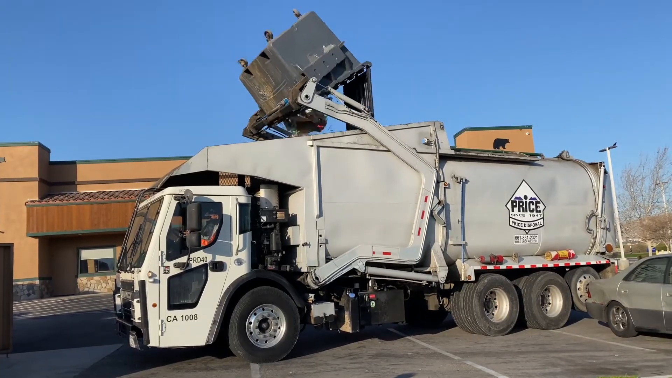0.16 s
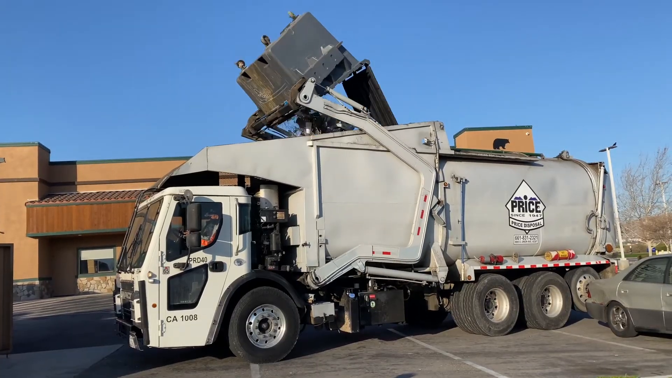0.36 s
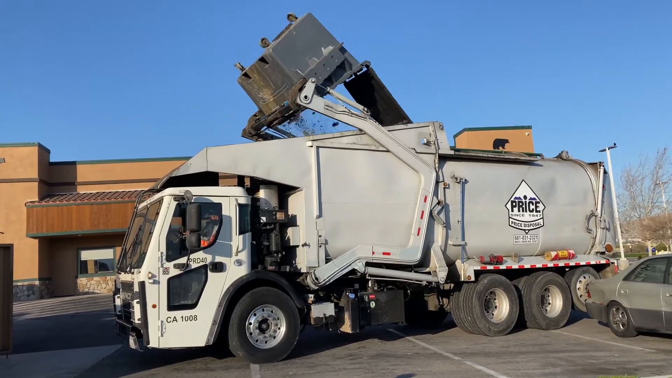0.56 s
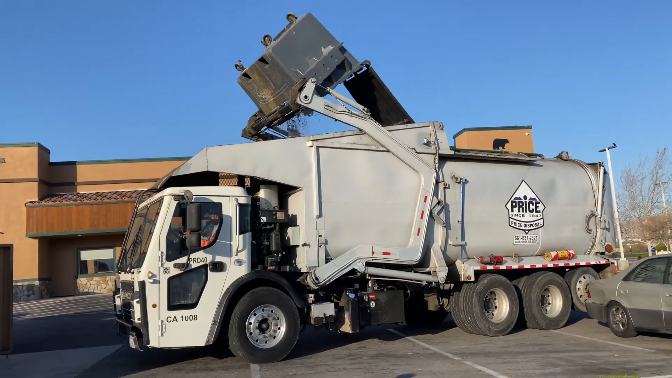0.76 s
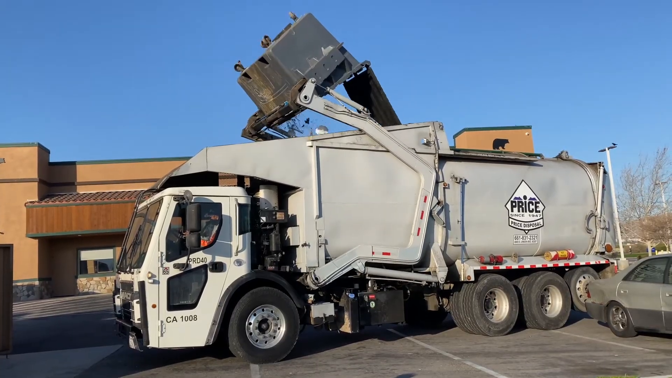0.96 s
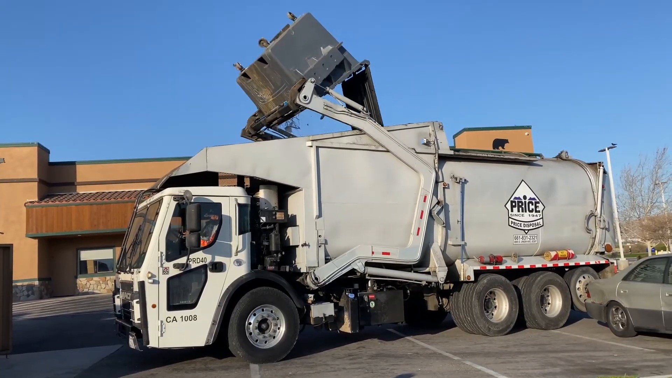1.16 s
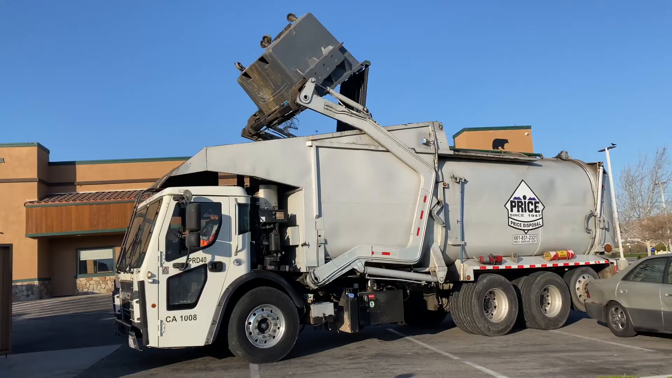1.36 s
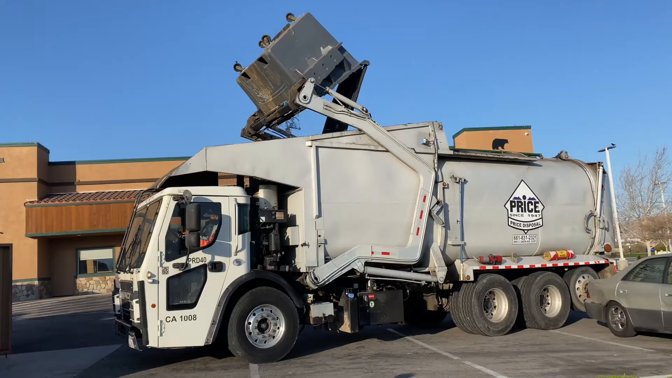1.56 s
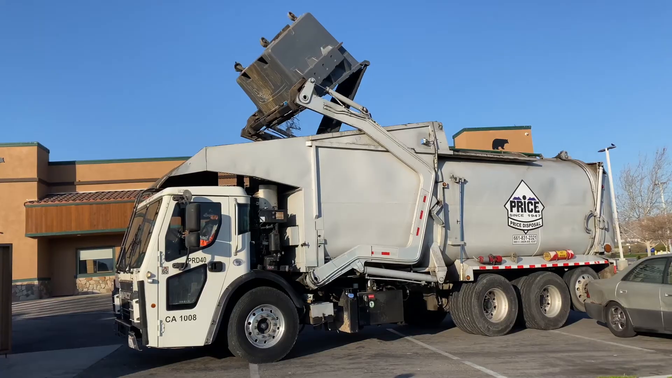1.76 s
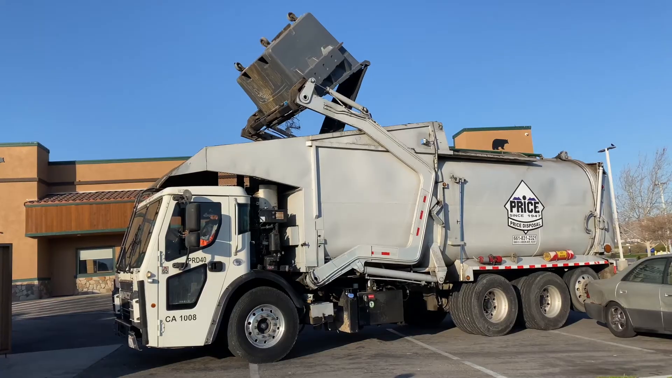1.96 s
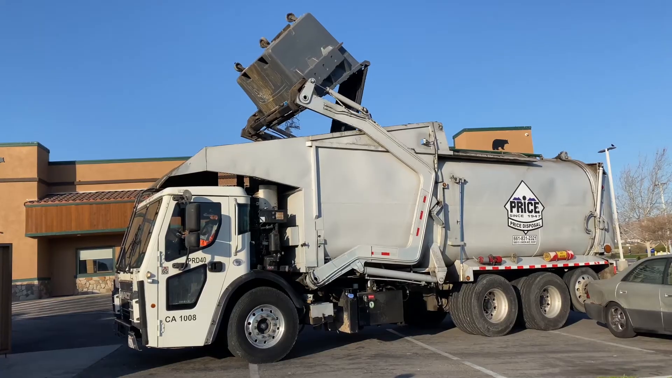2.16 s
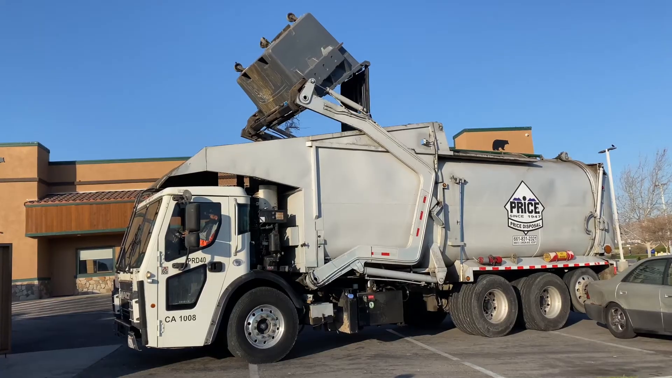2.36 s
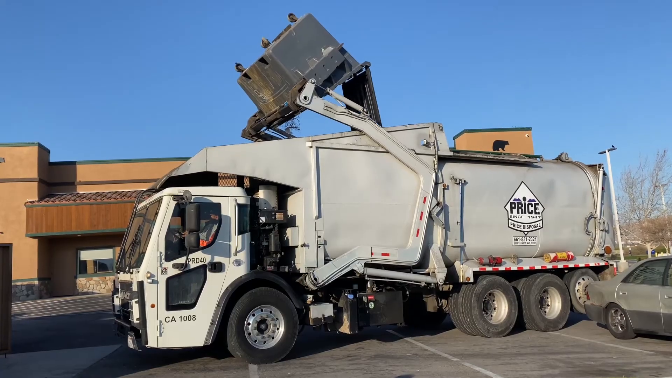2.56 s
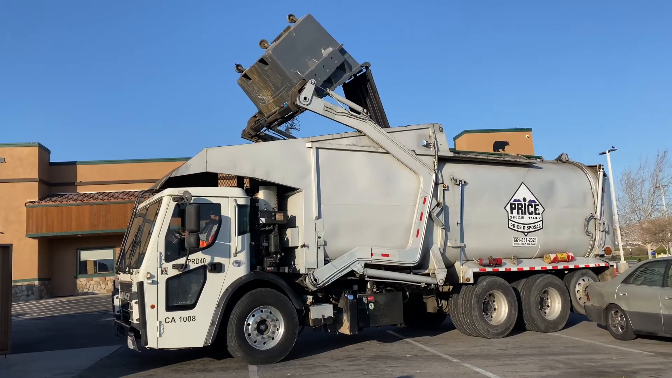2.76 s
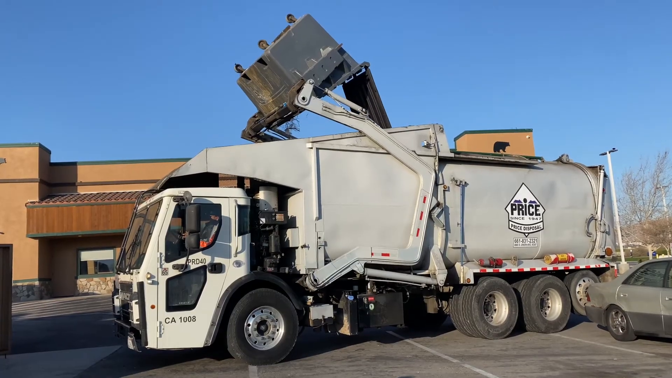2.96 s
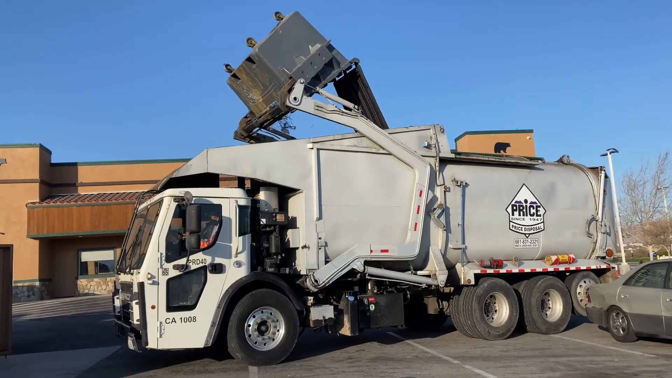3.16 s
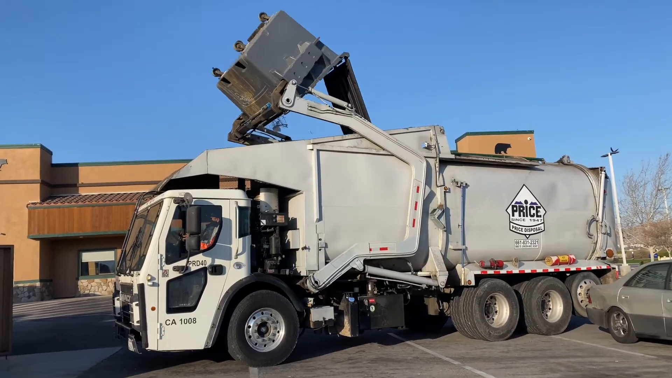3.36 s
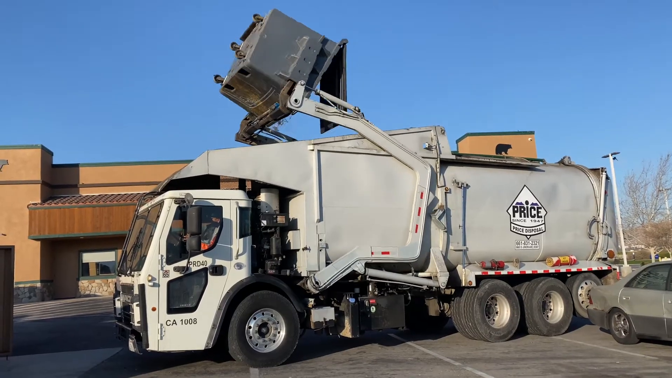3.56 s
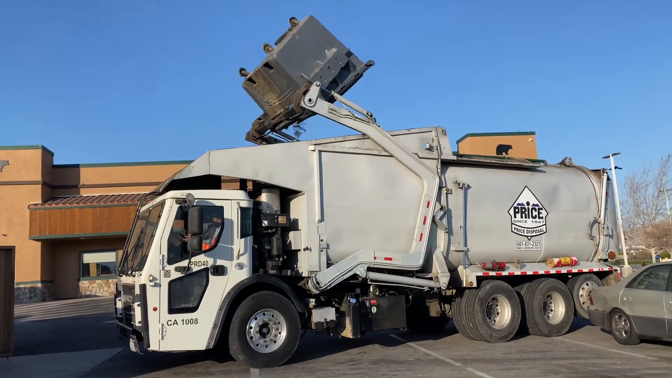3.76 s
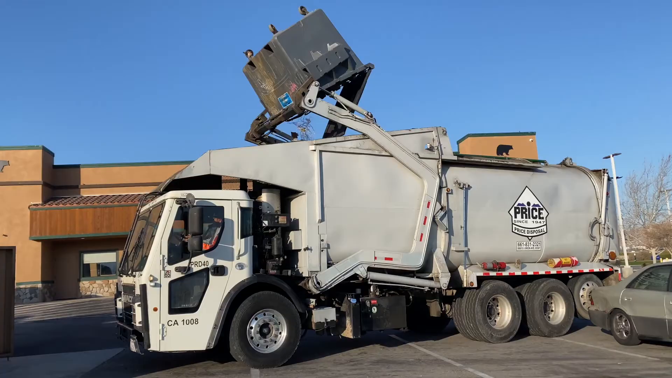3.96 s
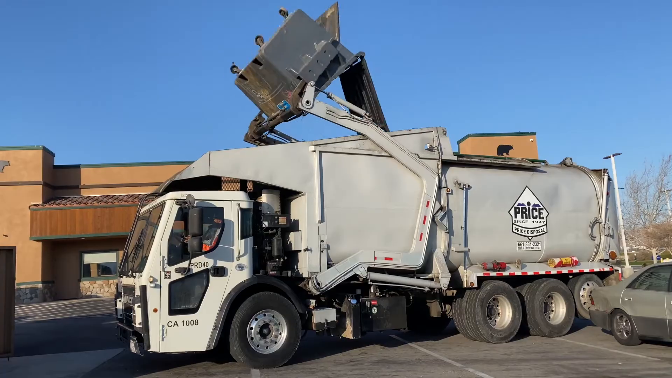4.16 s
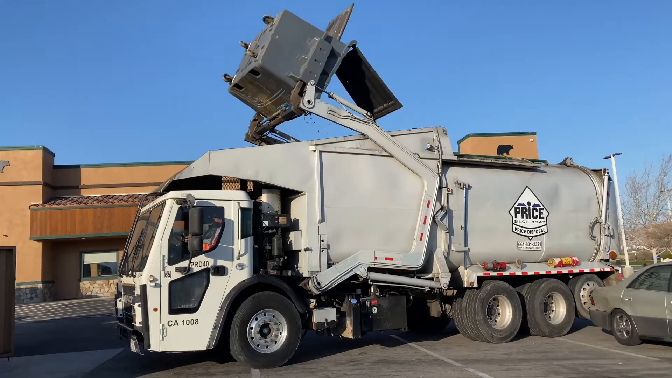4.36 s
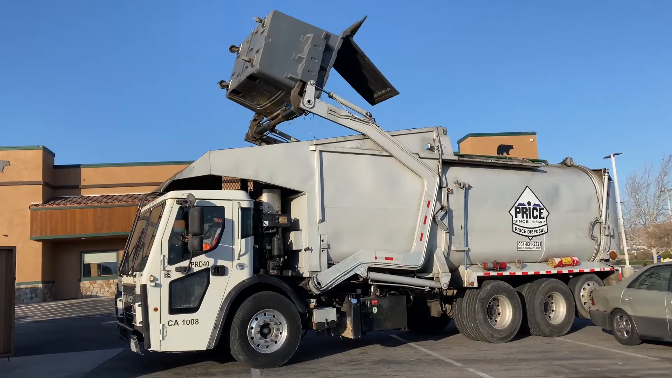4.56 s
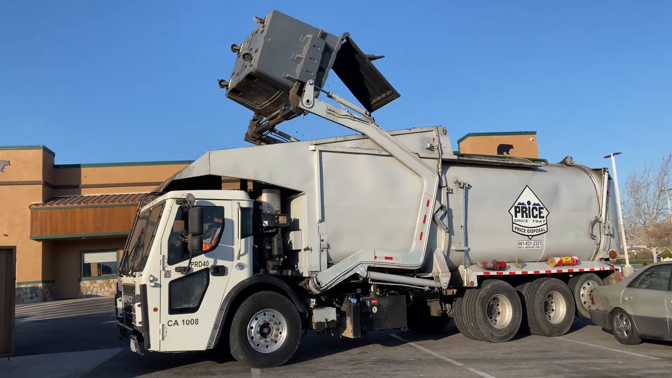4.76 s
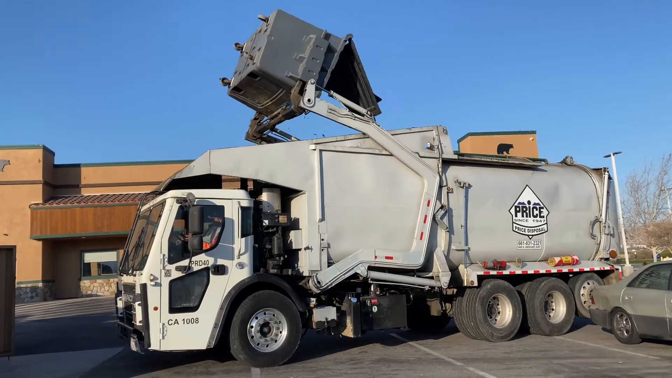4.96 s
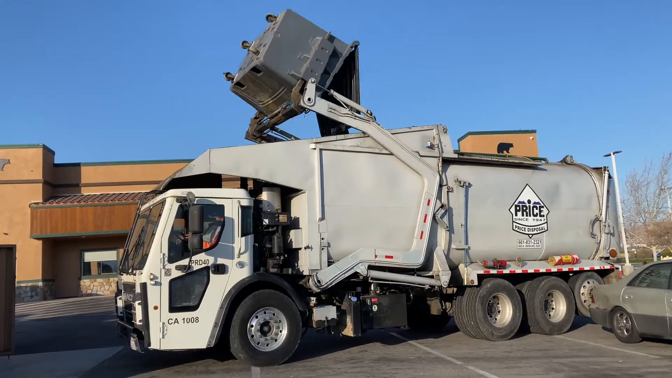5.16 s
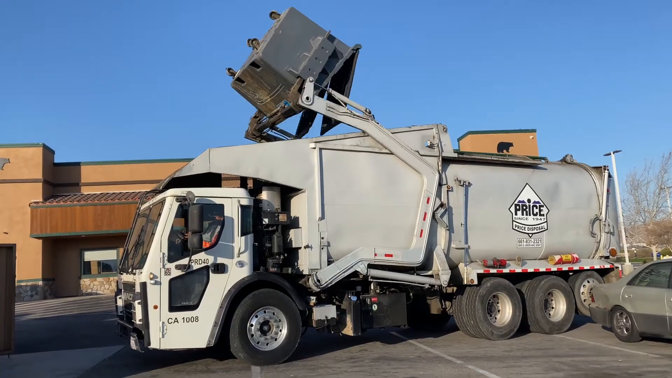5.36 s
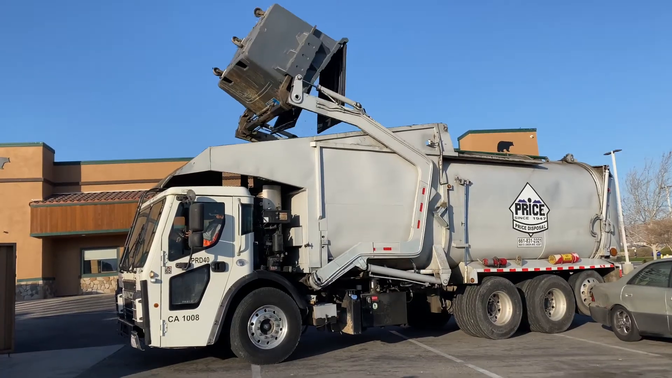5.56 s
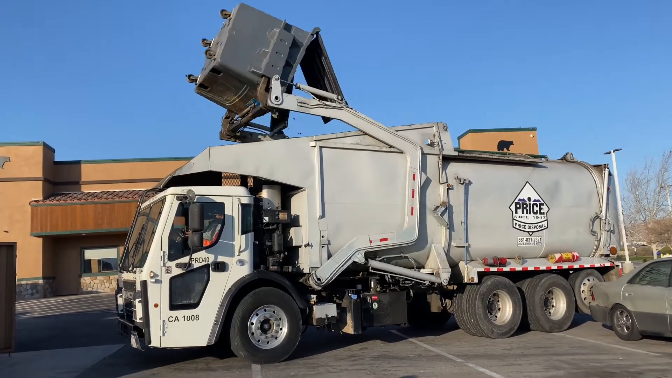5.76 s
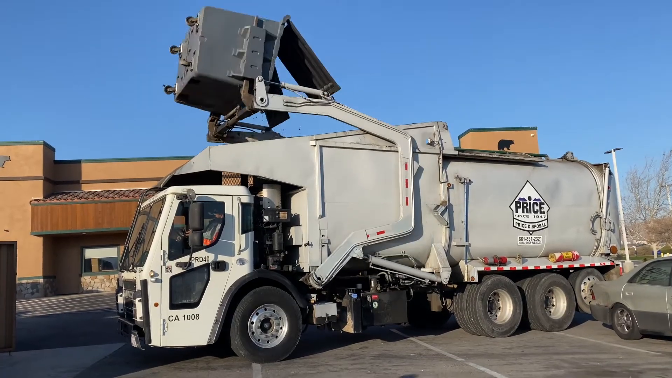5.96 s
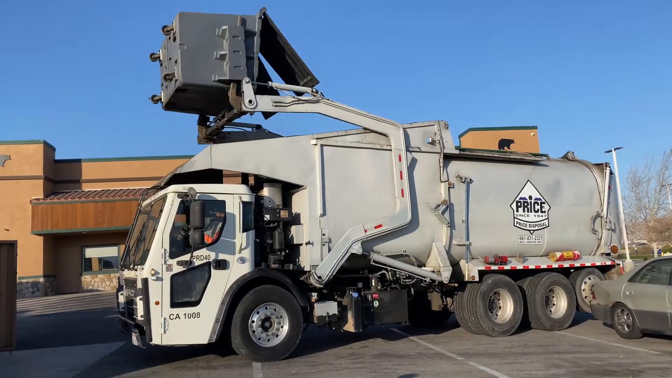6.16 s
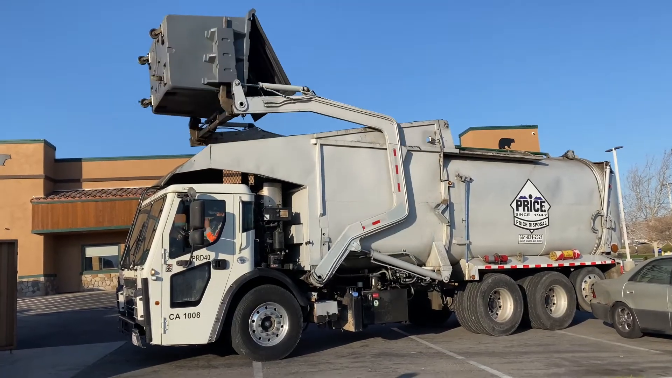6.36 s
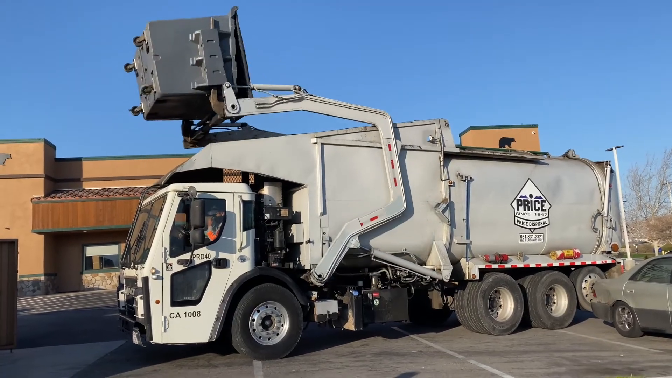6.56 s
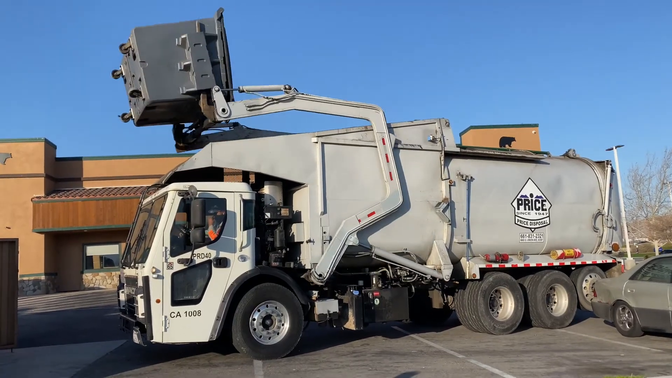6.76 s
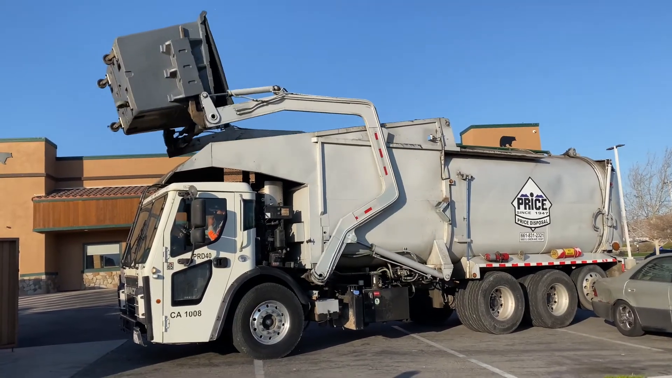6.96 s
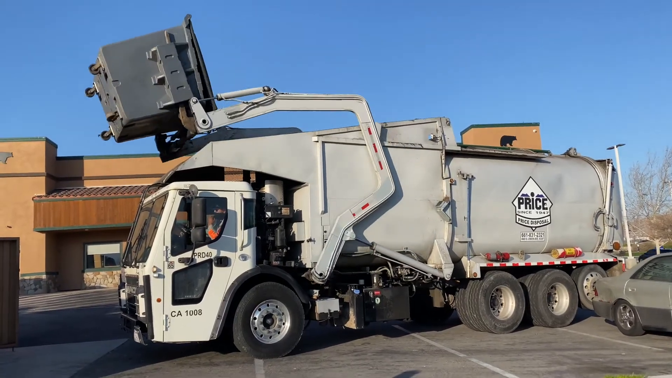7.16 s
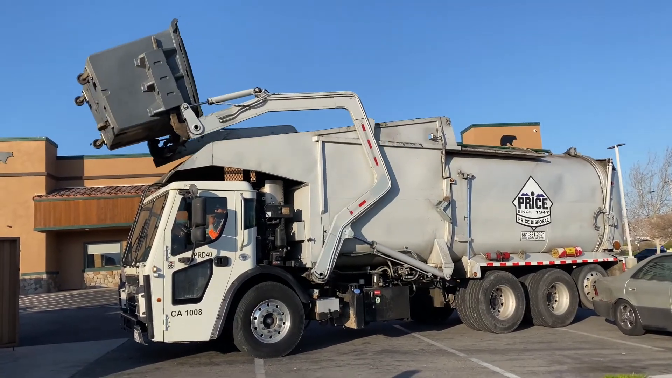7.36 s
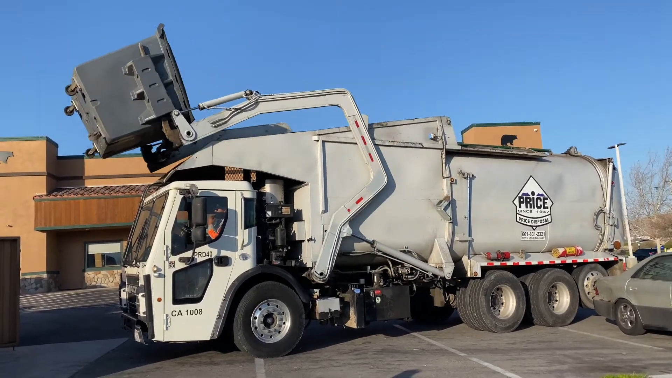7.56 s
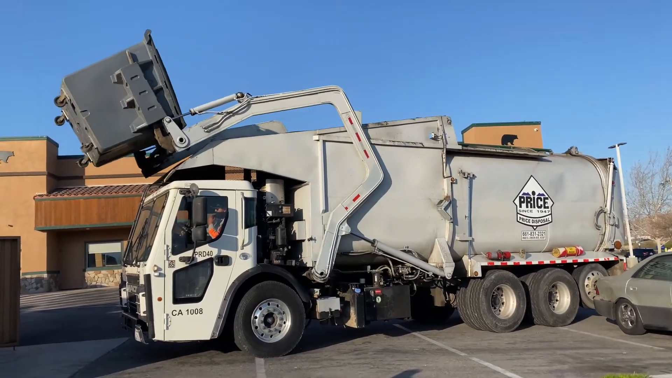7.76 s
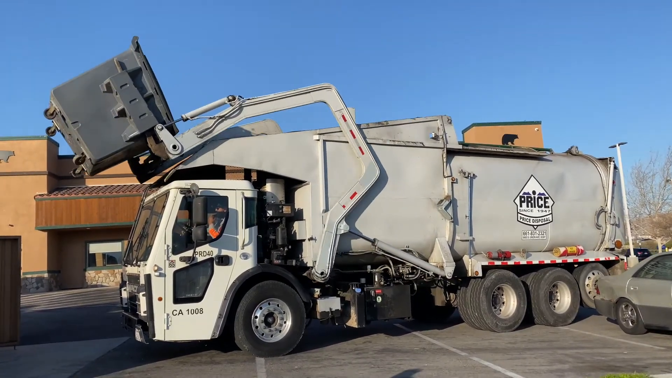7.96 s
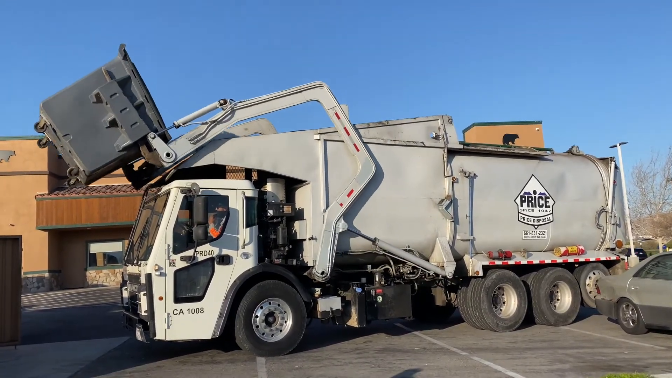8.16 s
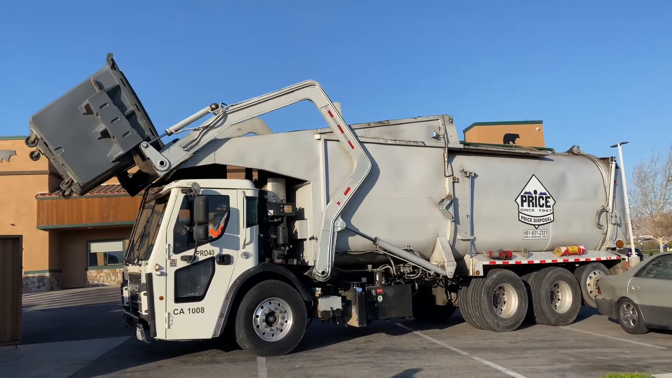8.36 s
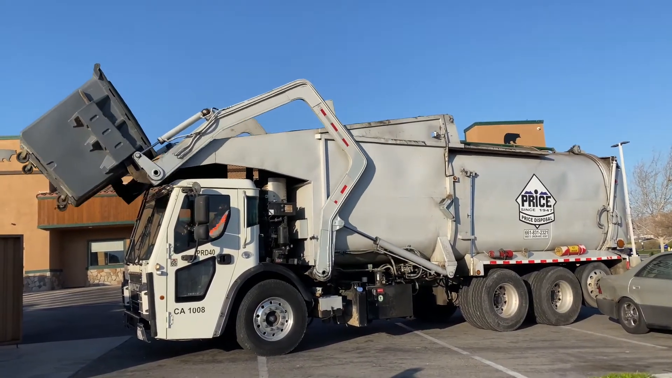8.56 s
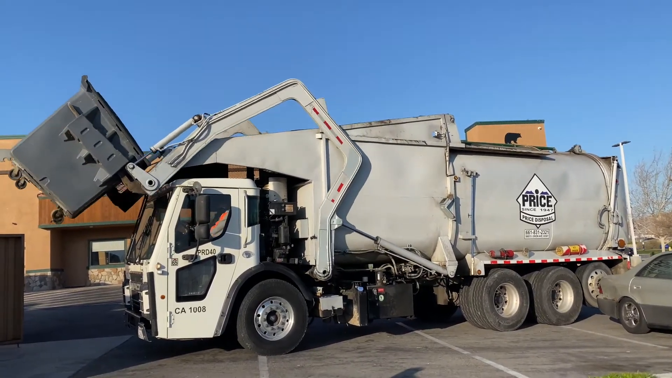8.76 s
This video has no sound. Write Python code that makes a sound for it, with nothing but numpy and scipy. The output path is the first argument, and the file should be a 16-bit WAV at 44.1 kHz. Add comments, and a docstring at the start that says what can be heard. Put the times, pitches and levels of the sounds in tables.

```python
"""A diesel labours, hydraulic oil hisses and a steel bin booms at once: a front-loading garbage truck in a
parking lot, heard from the side, shakes a dumpster over its hopper, then lowers it. Six unequal firings pulse
the exhaust, knock the block and pace pump and drone; noise and dying modes make the bin's bangs, lid slaps
and rattles. Chirps and brief valve puffs join in. A shop front answers the metal with a diffuse tail; a
stereo microphone spreads the scene and the recorder's limiter holds down the peaks."""
import sys
import numpy as np
from scipy import signal
from scipy.fft import rfft, irfft, next_fast_len
from scipy.io import wavfile
from scipy.ndimage import uniform_filter1d, minimum_filter1d, map_coordinates

SR = 44100
rng = np.random.default_rng(int(sys.argv[2]) if len(sys.argv) > 2 else 0)


def generate_wav(signal):
    """Clip the signal to [-1, 1] and save it as 16-bit WAV at the path in sys.argv[1]."""
    frames = np.transpose(np.atleast_2d(signal))
    scaled = np.clip(frames, -1, 1) * 32767
    pcm = np.round(scaled).astype(np.int16)
    wavfile.write(sys.argv[1], SR, pcm)


N = 388962


def amp(db):
    """Decibels to gain."""
    return 10 ** (np.asarray(db) / 20)


def unit(x):
    """Scale to rms 1."""
    return x / np.sqrt(np.mean(x ** 2) + 1e-18)


def along(points, hz):
    """Interpolate (frequency, value) points on a log axis."""
    f, v = np.transpose(points)
    return np.interp(np.log(hz + 1), np.log(f + 1), v)


def curves(rows):
    """One value per sample for each column after the time."""
    s, *cols = np.transpose(rows)
    return [np.interp(np.arange(N) / SR, s, c) for c in cols]


def wobble(rate):
    """A smooth random curve, rate knots a second."""
    knots = rng.standard_normal(int(N * rate / SR) + 4)
    return map_coordinates(knots, [np.arange(N) * rate / SR])


def filtered(x, response):
    """Filter x by a complex response of frequency."""
    n = x.shape[-1]
    m = next_fast_len(n + SR // 4)
    return irfft(rfft(x, m) * response(np.fft.rfftfreq(m, 1 / SR)), m)[..., :n]


# left-right likeness of noise: (frequency [Hz], correlation [-1 to 1])
LIKENESS = [(100, .999), (250, 1), (500, 0.94), (1000, 0.96), (3000, 0.49), (8000, 0.83), (14000, 1)]


def white(size):
    """Stereo noise whose likeness between left and right varies with frequency."""
    def mid_and_side(hz):
        turn = np.arccos(np.clip(along(LIKENESS, hz), -1, 1)) / 2
        return np.array([np.cos(turn), np.sin(turn)])
    mid, side = filtered(rng.standard_normal((2, size)), mid_and_side)
    return np.array([mid + side, mid - side])


def noise(spectrum, size):
    """Coloured stereo noise of rms 1."""
    return unit(filtered(white(size), lambda hz: amp(along(spectrum, hz))))


def resonances(modes, hz):
    """Causal response of (frequency, width, level) modes with alternating signs."""
    response = 0
    for k, (c, w, db) in enumerate(modes):
        response = response + (-1) ** k * amp(db) * 1j * hz * w / (c * c - hz * hz + 1j * hz * w)
    return response


def even(x, smoothing):
    """Iron out level swings slower than the smoothing [s], so that a narrow noise rings steadily."""
    power = uniform_filter1d(np.mean(x ** 2, axis=0), max(2, round(smoothing * SR)))
    return x / np.sqrt(np.abs(power) + 1e-6)


def add(track, s, sound):
    """Mix a sound into a track at time s."""
    start = max(0, round(s * SR))
    track[..., start:start + sound.shape[-1]] += sound[..., :N - start]


def contacts(t, rattle, rebound=0.49, contact_t60=0.024, count=10):
    """Envelope of a contact and its ever weaker rebounds, 0.15 to 3 times rattle [s] later."""
    late = (np.arange(count) + rng.uniform(0, 1, count)) / count
    delays = np.append(0, rattle * (0.15 + 2.85 * late))
    sizes = np.append(1, rebound * rng.uniform(0.43, 1, count) * (1 - 0.48 * late))
    power = 0
    for d, size in zip(delays, sizes):
        power = power + (size * (t >= d) * amp(-60 * np.abs(t - d) / contact_t60)) ** 2
    return np.sqrt(power)


# hydraulic strokes: rock the bin, tilt it, hold it, jerk it, lift it clear, swing it forward,
# lower the arms, ease them down: (start [s], end [s], then what each adds:
# engine load [dB], oil hiss [dB], pump whine [dB], drone [dB])
STROKES = [(0, 0.4, 0, 6.5, 14, 13.5), (.4, 2.4, 2.5, 8, 17.5, -10), (2.4, 3.05, 0, 0, 3, -5),
           (3.05, 3.4, 3, 5.5, -2, -4), (5.42, 6.05, 3.5, 4.5, 13, 14.5), (6.25, 7.23, 5, 4.5, 5, 6),
           (7.2, 7.95, 3, 3, 9, 12), (7.95, 9, 3, 3, 6, 9.5)]
VALVE_RAMP_S = 0.43  # a control valve takes this long to open or close


def strokes():
    """Extra dB of load, hiss, whine and drone while a valve stands open."""
    t = np.arange(N) / SR
    opened = lambda s: np.clip((t - s) / VALVE_RAMP_S + .5, 0, 1)
    return sum(np.outer(extra_db, opened(start) - opened(end)) for start, end, *extra_db in STROKES)


CRUISE_RATE = 90  # firings a second


def revved(speed, level_db, doubling_db):
    """Level in dB of an unloaded engine sound: its cruise level and its gain per doubled speed."""
    return level_db + doubling_db * np.log2(speed / CRUISE_RATE)


# exhaust and body cavities: (frequency [Hz], width [Hz], level [dB])
PIPE = [(65, 24, 4), (122, 59.6, 0.5), (196.5, 69, -2), (249.7, 20.2, 8), (333, 21, -12.5),
        (446, 44, -12.5), (665, 270, -15)]
GAS_SHARE = 0.36  # rushing gas against firing pulses


def exhaust(count, strength):
    """Firing impulses and rushing gas excite the damped cavities of the exhaust."""
    pipe = lambda hz: resonances(PIPE, hz) / (1 + (hz / 900) ** 4)
    pulses = unit(filtered(np.diff(count, prepend=0) * strength, pipe))
    gas = unit(filtered(white(N), pipe))
    return unit((1 - GAS_SHARE) * pulses + GAS_SHARE * gas)


def per_cycle(firing, size=256):
    """Vibration of the moving parts, the same in every engine cycle of six firings."""
    pattern = rng.standard_normal(size)
    return unit(map_coordinates(pattern, [firing / 6 % 1 * size], mode="grid-wrap"))


# engine mechanical noise: (frequency [Hz], level [dB per Hz])
CLATTER = [(120, -5), (300, 4.5), (420, -5.5), (630, 4), (850, -3), (1300, -3), (2000, -8.5), (2500, -9),
           (3200, -12.5), (3900, -16.5), (5000, -23), (9000, -39.5), (16000, -54)]
# colour of the block's panels: (frequency [Hz], width [Hz], level [dB])
PANELS = [(705, 250, 1.5), (1280, 180, 3), (1650, 61, -8), (1830, 12, 9.5), (2032, 133, 14.5),
          (2069, 148, -11), (2412, 83, 7), (2745, 33, -31), (2890, 68, 1)]
REPEAT_SHARE = 0.28  # share of clatter power that repeats every engine cycle
SHAFT_SWING = 0.16  # how much the clatter pulses with each shaft turn


def block_clatter(firing, strength, surge, knock_depth=0.048):
    """Each firing lets out a burst of mechanical noise through the block and its panels."""
    def block(hz):
        panels_db = sum(db * np.exp(-((hz - c) / w) ** 2) for c, w, db in PANELS)
        return amp(along(CLATTER, hz) + panels_db)
    knock = 1 + knock_depth * np.abs(strength) * 2 * np.exp(-(firing % 1) / 0.21)
    fresh = unit(filtered(knock * white(N), block))
    repeated = unit(filtered(knock * per_cycle(firing), block))
    shake = np.sqrt(1 - REPEAT_SHARE) * fresh + np.sqrt(REPEAT_SHARE) * repeated
    waver = amp(0.21 * wobble(22) + 0.8 * wobble(90))
    return waver * shake * (1 + SHAFT_SWING * unit(surge - surge.mean()))


def drive_ticks(surge):
    """Once a shaft turn the drive ticks in the middle treble."""
    spectrum = [(700, -36), (1400, 17.0), (2500, 5.0), (3900, 4.5), (4800, -11.0), (9000, -35), (16000, -45)]
    return unit(surge * noise(spectrum, N))


# oil hiss: (frequency [Hz], level [dB per Hz])
OIL = [(1000, -20), (3500, -3), (5000, -2), (7500, -1), (10500, -3), (12300, -6), (14000, -14),
       (16000, -19)]


def oil_hiss(surge, pump_ripple=0.73):
    """Turbulent oil hisses and surges once a shaft turn."""
    return amp(1.2 * wobble(19.0)) * unit(noise(OIL, N) * (1 + pump_ripple * surge))


def firing_drone(firing, flutter=0.2, waver_db=3.4):
    """Multiples of the firing rate drone with an unsteady phase [radians] and level."""
    turn = 2 * np.pi * firing + flutter / 2 * (wobble(15) + wobble(50))
    tones = np.sin(2 * turn) + amp(-7.0) * np.sin(3 * turn) + amp(-20.5) * np.sin(4 * turn)
    return amp(waver_db * wobble(10)) * unit(tones)


# pump whine: (multiple of the pump stroke rate, relative level [dB])
PUMP_ORDERS = [(1, 0.5), (2, -2), (3, -10), (4, -12.5)]
PUMP_RATIO = 10 / 9  # pump strokes to a firing


def pump_whine(firing, flutter=0.65):
    """The pump whines at multiples of its stroke rate, with an unsteady phase [radians]."""
    stroke = 2 * np.pi * PUMP_RATIO * firing + flutter / 2 * (wobble(20) + wobble(60))
    return sum(amp(db + 3.9 * wobble(6.0)) * unit(np.sin(round(k) * stroke)) for k, db in PUMP_ORDERS)


# engine speed: (time [s], firing rate [firings a second])
SPEED = [(0, 93), (.33, 73), (.58, 99), (.8, 93.5), (1, 99), (2.1, 105), (2.35, 116), (2.8, 108), (3.5, 85),
         (4.4, 80), (5.0, 64), (5.45, 61), (5.9, 93), (6.25, 114), (6.6, 120), (7.0, 110), (7.5, 95),
         (8, 81.5), (8.4, 75), (8.8, 72.5)]
EXHAUST_LOAD_SHARE = 0.31  # how much of the load's gain the exhaust takes on
FIRING_SCATTER = 0.2  # random spread of firing strength


def engine(uneven=1.0):
    """Six unequal cylinders fire into the pipe, knock in the block and turn the pump."""
    speed, = curves(SPEED)
    load_db, flow_db, whine_db, drone_db = strokes()
    firing = np.cumsum(speed * (1 + 0.004 * wobble(20))) / SR
    count = firing.astype(int)
    cylinders = np.array([1.3, -.3, .5, -.2, -1.1, -.2])
    scatter = FIRING_SCATTER * rng.standard_normal(SR)[count]
    strength = 1 + uneven * cylinders[count % len(cylinders)] + scatter
    # the drive surges at a new strength on every shaft turn of three firings
    shaft = firing / 3
    turn_strength = rng.uniform(0.66, 2.0, SR)[shaft.astype(int)]
    surge = uniform_filter1d(np.exp(-(shaft % 1) / 0.66) * turn_strength, size=260)
    exhaust_db = revved(speed, -28, 1.1) + EXHAUST_LOAD_SHARE * load_db
    clatter_db = revved(speed, -31.5, 2.24) + load_db
    oil_db = revved(speed, -48.5, 0.95) + flow_db
    out = amp(exhaust_db) * exhaust(count, strength)
    out = out + amp(clatter_db) * block_clatter(firing, strength, surge)
    out = out + amp(clatter_db - 11) * drive_ticks(surge)
    out = out + amp(oil_db) * oil_hiss(surge)
    out = out + amp(-43 + drone_db) * firing_drone(firing)
    return out + amp(-50 + whine_db) * pump_whine(firing)


# low body noise: (frequency [Hz], level [dB per Hz])
RUMBLE = [(15, -38), (28, -16), (40, -25), (52, 11), (61, 3.5), (70, -20), (90, -3.5), (160, -4),
          (400, -58), (1500, -90)]
# body hum: level at rest, level woken by a blow relative to its boom, dying time
HUM_DB, HUM_SHAKE_DB, HUM_T60_S = -27.5, -12, 1.6


def rumble(hum_hz=60.73, hum_db=-2, rumble_db=-3):
    """The truck body drones at its lowest resonance whatever the engine speed, louder after each blow."""
    t = np.arange(N) / SR
    shaken = 0
    for s, _, boom_db, _ in BLOWS:
        shaken = shaken + (t > s) * amp(boom_db + HUM_SHAKE_DB - 60 * np.abs(t - s) / HUM_T60_S) ** 2
    hum = unit(np.sin(2 * np.pi * np.cumsum(hum_hz + 1.0 * wobble(8)) / SR))
    body = even(amp(hum_db) * hum + amp(rumble_db) * noise(RUMBLE, N), 0.041)
    return np.sqrt(amp(HUM_DB) ** 2 + shaken) * body


# blows of bin and forks, strengths before each layer's own trim:
# (time [s], sheet steel [dB], boom of the hollow body [dB], hard contact [dB])
BLOWS = [(0.002, -16, -10.5, -25), (0.093, -21, -12.5, -34), (0.269, -20.5, -11.5, -35),
         (0.63, -20, -29, -21), (0.66, -23, -19, -35), (3.178, -22.5, -23, -30), (3.344, -21.5, -36, -35),
         (3.405, -13.5, -18, -24), (3.472, -19, -19, -29.5), (3.528, -4.5, -13, -16.5),
         (3.552, -14.5, -10, -30), (3.61, -35, -22, -34), (3.724, -15, -13, -20.5), (3.76, -14, -20, -24),
         (3.778, -9.5, -12, -15.5), (3.797, -8.5, -10, -28), (3.83, -14, -17, -43),
         (3.893, -18.5, -14, -25.5), (3.925, -26, -11, -43), (4.019, -24, -12, -31),
         (4.127, -16.5, -12.5, -33), (4.192, -12, -13, -25), (4.239, -11, -9, -26.5),
         (4.262, -34, -18, -26), (4.3, -14.5, -25, -27.5), (4.362, -14, -13.5, -25), (4.39, -22, -14, -28),
         (4.434, -24, -20, -31), (4.472, -19, -25, -23), (4.495, -12.5, -8.5, -26.5),
         (4.518, -18, -12, -26.5), (4.62, -23, -12, -45), (4.697, -25.5, -16, -44),
         (5.216, -25, -21.5, -34), (6.022, -7, -14, -23), (6.04, -20, -10, -23),
         (6.066, -16.5, -9.5, -24.5), (6.081, -14, -9, -43), (6.2, -24, -12.5, -51), (6.292, -22, -17, -32),
         (6.528, -24, -15.5, -49), (6.645, -14.5, -25, -21.5), (6.668, -17, -21, -34)]
# light clinks of the fork pins: (time [s], level [dB])
CLINKS = [(0.267, -25), (0.966, -26), (3.179, -25.5), (5.067, -31)]
# noise of sheet steel, hollow body and hard contact: (frequency [Hz], level [dB per Hz])
SHELL = [(90, -6), (150, -13), (200, 11.5), (270, 6), (350, -2.5), (480, -4), (650, -5), (850, -11.5),
         (1200, -17), (2000, -43), (5000, -40.5), (16000, -80)]
BOOM = [(20, -33), (35, -40), (50, -1), (65, 17.5), (82, 15), (105, -7), (150, -1), (260, -64), (1200, -90)]
CLANK = [(400, -30), (1000, 17.5), (1500, 9), (2300, -19), (3200, 6.5), (4500, -3), (7500, 0.5),
         (11000, -20), (16000, -30)]
# bin modes: (frequency [Hz], level [dB], time to fall 60 dB [s])
STEEL = [(155, -2, 0.15), (191, -7, 0.84), (241.6, 2, 0.41), (280.9, -2, 0.31), (377.2, -8.5, 0.23),
         (415, -8, 0.18), (448.8, -6, 0.27), (514.2, -5.5, 0.25), (591, -4.5, 0.22), (634, -11, 0.32),
         (922, -15, 0.3), (986, -20, 0.17), (1108, -16, 0.35)]
# fork and hinge resonances: (frequency [Hz], width [Hz], level [dB])
FORK = [(1447, 95, 7.5), (1714, 150, 3), (2010, 52, 8), (2220, 80, 1.5), (2530, 77, 7), (2940, 78, 5),
        (3580, 410, -2)]
RATTLE_S, BOOM_HOLD_S = 0.018, 0.013  # time scale of rebounds; the boom holds this long before it dies
RING_DB = -4  # the sheet modes, relative to a blow's sheet strength
CRACKLE_T60_S = 0.012  # each rebound of bare steel on steel is this short


def sheet_ring(t):
    """One blow wakes the sheet modes at new strengths, each dying at its own pace."""
    ring = 0
    draws = rng.standard_normal((len(STEEL), 3))
    for (hz, db, t60), (a, b, c) in zip(STEEL, draws):
        tone = np.sin(2 * np.pi * hz * (1 + 0.0074 * b) * t + np.pi * c)
        ring = ring + amp(db + 2.5 * a - 60 * t / t60) * tone
    return ring / np.std(ring[:SR // 20]) * (1 - np.exp(-t / 0.003))


def dumpster(boom_t60=0.42, shell_t60=0.49, clank_t60=0.35, fork_db=1, wash=0.34, punch=1.0, clink_rattle=0.01):
    """Each blow strikes and rebounds; contact, sheets and hollow body each die away at their own pace."""
    t = np.arange(SR * 2 // 3) / SR
    power, rings = np.zeros((3, N)), np.zeros(N)

    def fade(t60, attack, hold=0):
        return amp(-60 * np.maximum(t - hold, 0) / t60) * (1 - np.exp(-t / attack))

    for s, shell_db, boom_db, clank_db in BLOWS:
        chatter = contacts(t, RATTLE_S)
        boom = amp(boom_db - 0.5) * fade(boom_t60, 0.0084, BOOM_HOLD_S)
        struck = fade(shell_t60, 0.00034) + punch * chatter
        shell = amp(shell_db - 4.0) * struck * (1 - np.exp(-t / 0.00055))
        crackle = contacts(t, RATTLE_S, rebound=0.56, contact_t60=CRACKLE_T60_S, count=8)
        crackle = 0.99 * crackle * (1 - np.exp(-t / 0.0006))
        clank = amp(clank_db) * (wash * fade(clank_t60, 0.0013) + crackle)
        add(power, s, np.array([boom, shell, clank]) ** 2)
        add(rings, s, amp(shell_db + RING_DB) * sheet_ring(t))
    # a pin clinks too lightly to wake the sheets or the body
    for s, db in CLINKS:
        add(power[2], s, (amp(db) * contacts(t, clink_rattle)) ** 2)
    boom, shell, clank = np.sqrt(power)
    forks = unit(filtered(white(N), lambda hz: resonances(FORK, hz)))
    hollow = boom * even(noise(BOOM, N), 0.028)
    sheets = shell * even(noise(SHELL, N), 0.0091)
    return rings + hollow + sheets + clank * (noise(CLANK, N) + amp(fork_db) * forks)


def parking_lot(x, t60=1.0, delay=0.066):
    """The shop front sends back a diffuse answer, late by a path some 22 m longer."""
    t = np.arange(SR // 2) / SR
    tail = rng.standard_normal((2, len(t))) * amp(-60 * t / t60) * np.clip((t - delay) / 0.0041, 0, 1)
    return signal.fftconvolve(x, tail / np.linalg.norm(tail[0]), axes=1)[:, :N]


# the lid's hinge rod rattles in its eyes: (time [s], level [dB])
HINGE_HITS = [(0.625, -26), (0.630, -18), (0.638, -20.5), (0.647, -22), (0.659, -26)]
# modes of the rod: (frequency [Hz], level [dB])
HINGE = [(1405, -1), (1740, -13), (1820, -7), (1981, -1), (2245, 3), (2622, -10), (2934, -3), (3208, -10),
         (3553, -16)]
HINGE_T60_S = 0.085


def hinge(crack_db=0, crack_t60=0.035):
    """The lid's steel hinge rod clangs in a quick run of contacts, each ringing it anew."""
    out, t = np.zeros(N), np.arange(SR // 4) / SR
    spectrum = [(500, -16), (1200, -3), (2100, 0), (3300, -4), (4500, -17), (9000, -32), (16000, -45)]
    for s, db in HINGE_HITS:
        ring = 0
        for (hz, level), (a, b) in zip(HINGE, rng.standard_normal((len(HINGE), 2))):
            ring = ring + amp(level + 3.5 * a) * np.sin(2 * np.pi * hz * t + np.pi * b)
        crack = amp(crack_db - 60 * t / crack_t60) * noise(spectrum, len(t))[0]
        add(out, s, amp(db) * (unit(ring) * amp(-60 * t / HINGE_T60_S) + crack))
    return out


# the loose lids slap against the bin: (time [s], level [dB])
LID_SLAPS = [(0.707, -16.5), (0.778, -19.5), (3.432, -20), (3.528, -13), (4.146, -26), (4.241, -19),
             (4.368, -18), (4.503, -16.5), (5.513, -27.5), (5.647, -23.5), (6.022, -17), (6.068, -13)]
# lid resonances: (frequency [Hz], width [Hz], level [dB])
LID = [(372, 120, -4.5), (636, 63, 1), (705, 57, 1.5), (820, 96, -7), (1040, 110, -11), (1400, 180, -22)]


def lids(t60=0.17):
    """A lid lands with a short, hollow knock of its damped panel resonances."""
    out, t = np.zeros((2, N)), np.arange(SR // 3) / SR
    response = lambda hz: resonances(LID, hz) / (1 + (hz / 1800) ** 2)
    for s, db in LID_SLAPS:
        panel = even(unit(filtered(white(len(t)), response)), 0.0064)
        add(out, s, amp(db - 60 * t / t60) * (1 - np.exp(-t / 0.0011)) * panel)
    return out


# chirps of a dry bearing: (time [s], nominal peak level [dB], pitch [Hz])
CHIRPS = [(.753, -35, 4580), (.824, -31, 3080), (.876, -39, 4560), (1.059, -38, 4540), (1.119, -32, 4580),
          (1.178, -33, 4630), (1.239, -35.5, 4540), (1.298, -35.5, 4560), (2.217, -37, 4330),
          (2.322, -40, 4150), (2.400, -39, 4000)]


def squeaks(scatter_db=2.0):
    """A dry bearing gives tiny chirps, a swelling tone roughened by a drifting phase."""
    out, t = np.zeros(N), np.arange(SR // 30) / SR
    swell = np.exp(-((t - .006) / .005) ** 2) + .15 * np.sin(np.pi * t / t[-1])
    for s, db, hz in CHIRPS:
        phase = 2 * np.pi * hz * t + .075 * np.cumsum(rng.standard_normal(len(t)))
        add(out, s, amp(db + scatter_db * rng.standard_normal()) * swell * np.sin(phase))
    return out


# puffs of air and oil at the valves: (time [s], length [s], jet level [dB], nozzle whistle level [dB])
PUFFS = [(2.442, 0.073, -42, -58), (2.994, 0.086, -32.5, -31), (3.715, 0.092, -41, -35),
         (6.636, 0.021, -29.5, -41), (7.29, 0.011, -39, -38)]


def valves(release=0.14, flutter_db=1.0):
    """Brief jets swell and hiss, with a broad whistle from the nozzle."""
    out, t = np.zeros((2, N)), np.arange(SR // 2) / SR
    jet_spectrum = [(2500, -25), (5000, -4), (8000, -2), (11500, 1), (14000, -4), (16000, -5)]
    whistle_spectrum = [(2900, -25), (3550, 0), (4000, 0), (4600, -6), (5300, -10), (7500, -24)]
    for s, length, db, whistle_db in PUFFS:
        jet = noise(jet_spectrum, len(t))
        whistle = noise(whistle_spectrum, len(t))
        gate = (1 - np.exp(-t / (0.086 * length))) * amp(-60 * np.maximum(t - length, 0) / release)
        gate = gate * amp(flutter_db * wobble(114)[:len(t)])
        add(out, s, gate * (amp(db) * jet + amp(whistle_db) * whistle))
    return out


# the bin judders on the forks: (time [s], length [s], level [dB])
JUDDERS = [(3.529, 0.038, -21.5), (3.782, 0.032, -17.5), (4.195, 0.12, -31.5), (4.363, 0.044, -32),
           (4.475, .042, -27.5), (6.062, 0.018, -23.5)]
# steel fork pockets: (frequency [Hz], width [Hz], level [dB])
POCKET = [(1100, 53, 10), (1460, 120, 1), (1700, 170, -1.5), (2067, 55, 0.5), (2490, 140, -9.5),
          (3090, 110, -6.5), (3350, 60, -6), (3700, 160, -12.5), (4120, 90, -14), (5470, 120, -14)]
JUDDER_RATE = 300  # mean contacts a second


def judder(release=0.093, bright_db=-20):
    """A dense run of uneven steel contacts rings the fork pockets."""
    out, t = np.zeros((2, N)), np.arange(SR // 3) / SR

    def pocket(hz):
        bright = 1j * hz / (2500 + 1j * hz) / (1 + 1j * hz / 5000)
        return resonances(POCKET, hz) + amp(bright_db) * bright

    for s, length, db in JUDDERS:
        hits = (rng.random(len(t)) < JUDDER_RATE / SR) * rng.uniform(.3, 1, len(t))
        # each contact decays over 2 ms
        grit = signal.lfilter([1], [1, -np.exp(-1 / (.002 * SR))], hits) * white(len(t))
        ring = unit(filtered(grit, pocket))
        add(out, s, amp(db - 60 * np.maximum(t - length, 0) / release) * even(ring, 0.019))
    return out


# left minus right level at the microphone: (frequency [Hz], level [dB])
BALANCE = [(60, -1), (250, -1), (560, -3.5), (1000, 3.5), (2000, 1), (4000, 0.5), (9000, 0)]
# phase by which the left port leads: (frequency [Hz], lead [radians])
LEAD = [(60, 0.053), (500, 0.3), (1000, 1.15), (2000, 0.54), (4000, 0.7), (8000, 2.17), (14000, 1.62)]


def microphone(x):
    """The left port leads the right in phase, and each port has its own colour."""
    sign = np.array([[1], [-1]])
    level = lambda hz: amp(sign * along(BALANCE, hz) / 2)
    return filtered(x, lambda hz: level(hz) * np.exp(1j * sign * along(LEAD, hz) / 2))


def scene():
    """Truck and bin, heard from the side by a stereo microphone."""
    metal = dumpster() + judder() + lids() + hinge() + valves() + squeaks()
    return microphone(engine() + rumble() + metal + amp(-32.0) * parking_lot(metal))


TOP_HZ = 15800  # band limit of the recorder


def record(dry):
    """A very fast limiter flattens the peaks; nothing passes above the band limit."""
    need = np.minimum(1, .88 / (np.abs(dry).max(0) + 1e-9))
    gain = uniform_filter1d(minimum_filter1d(need, size=90), size=80)
    return filtered(dry * gain, lambda hz: hz < TOP_HZ)


dry = scene()
out = record(dry)
generate_wav(out)
```